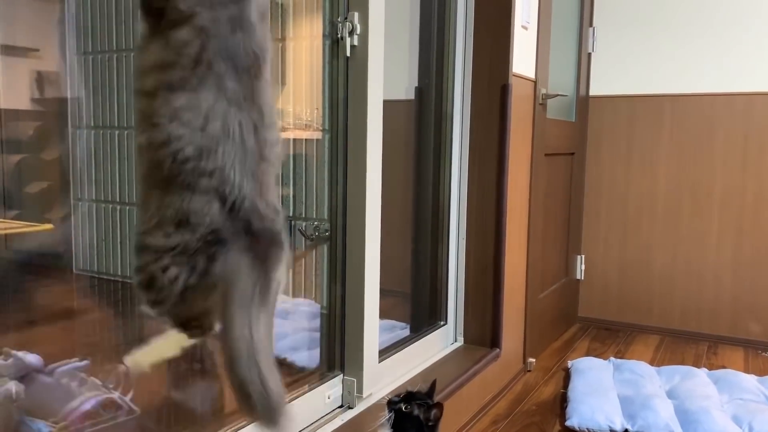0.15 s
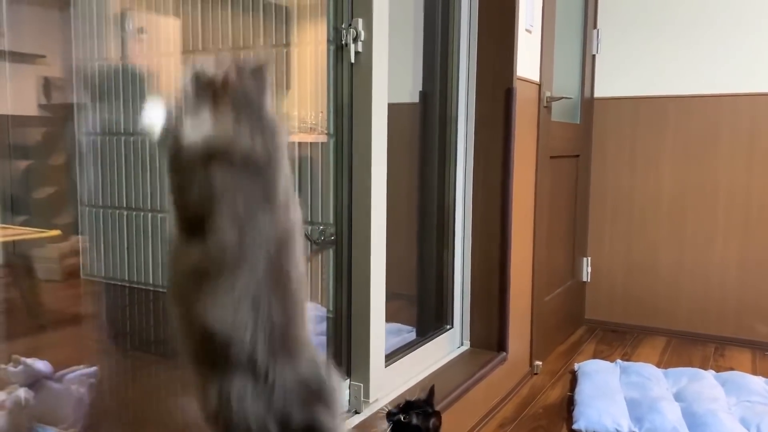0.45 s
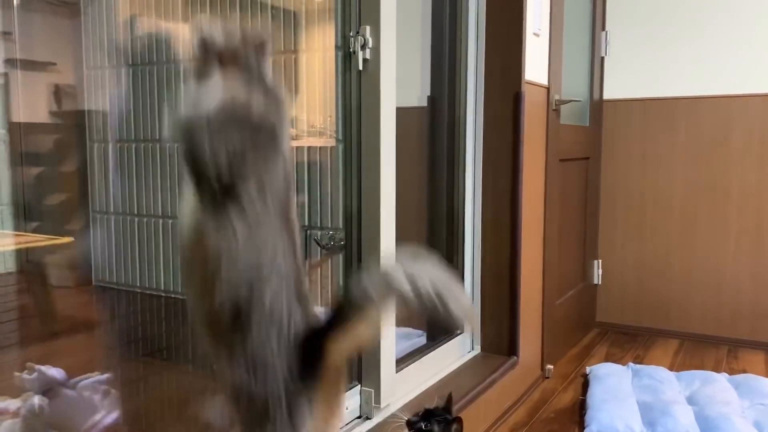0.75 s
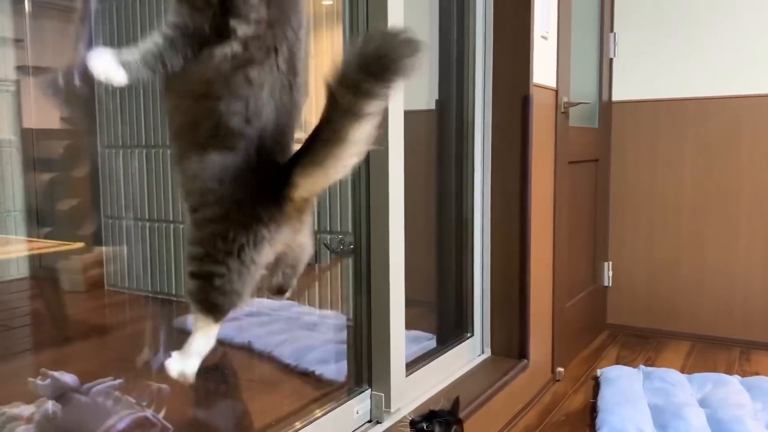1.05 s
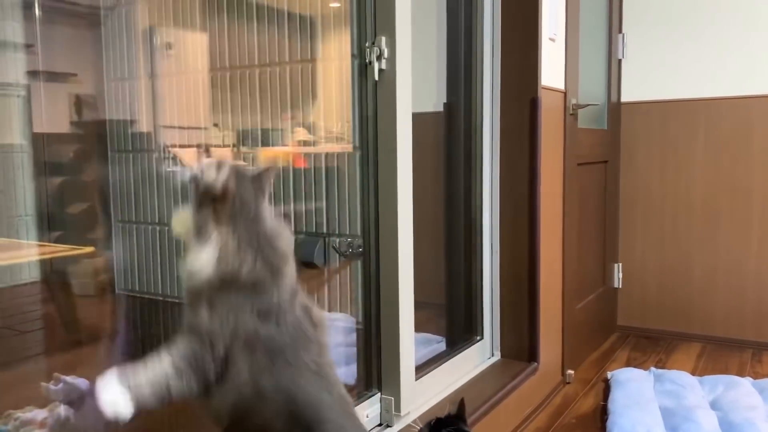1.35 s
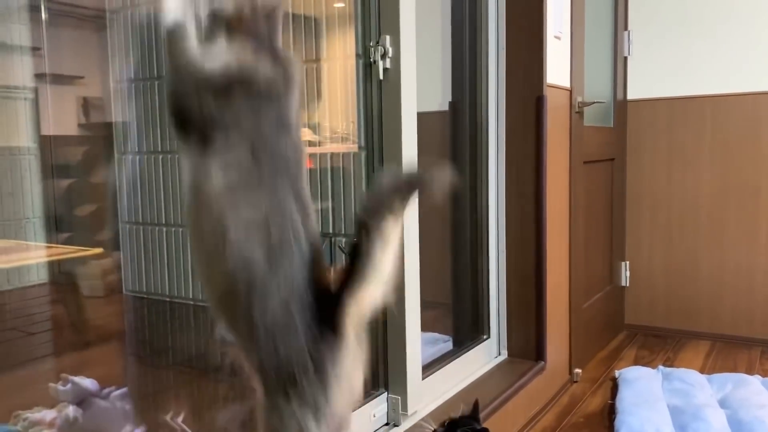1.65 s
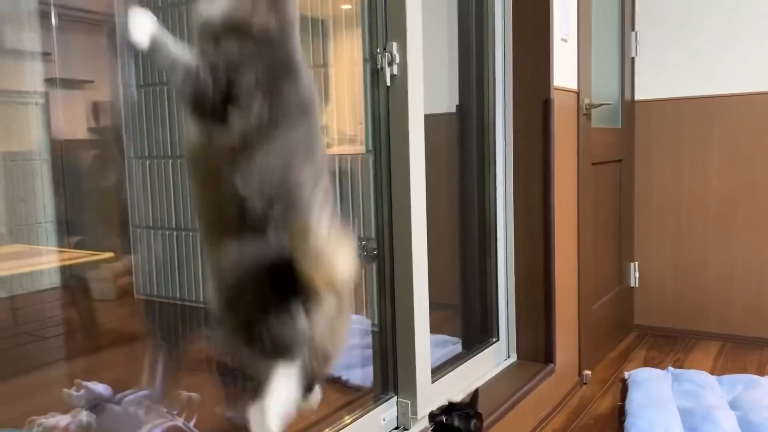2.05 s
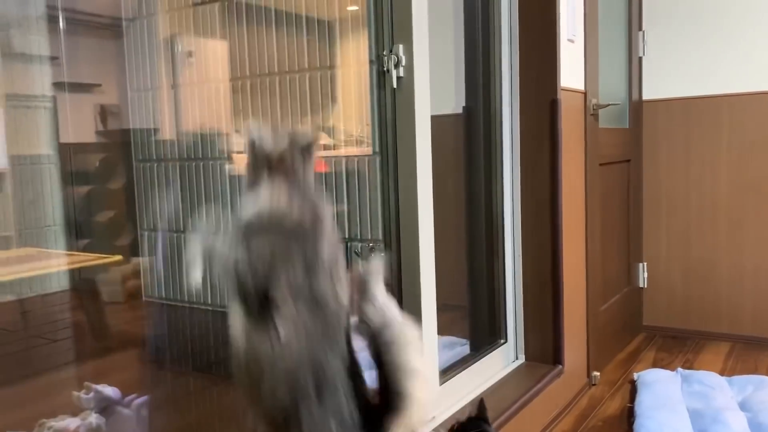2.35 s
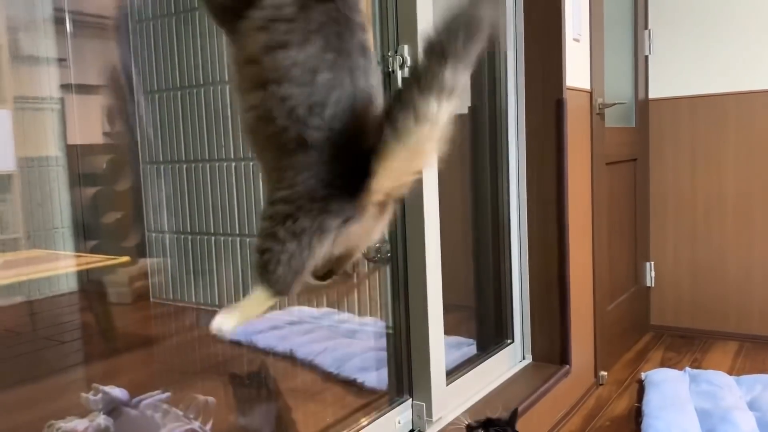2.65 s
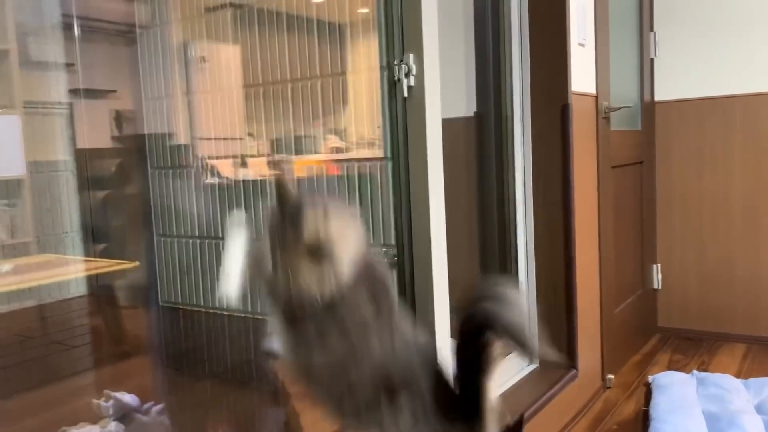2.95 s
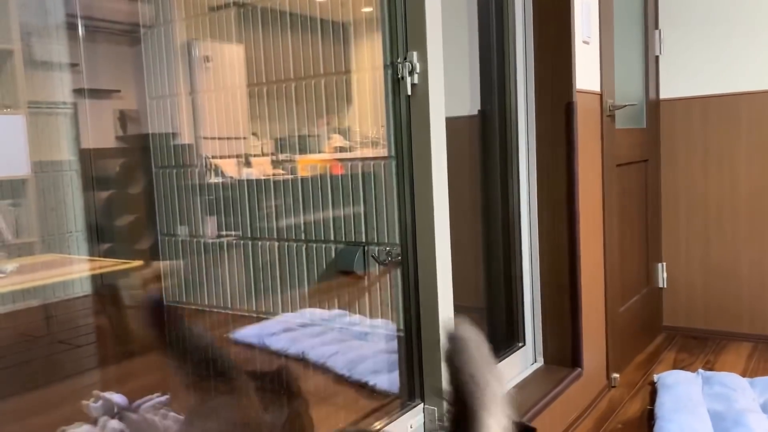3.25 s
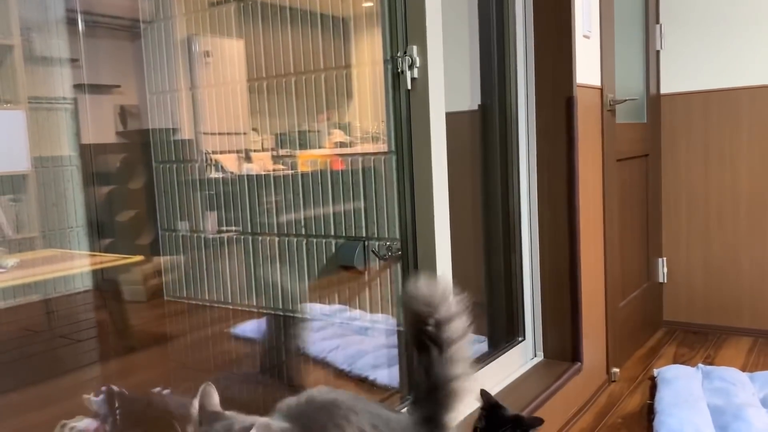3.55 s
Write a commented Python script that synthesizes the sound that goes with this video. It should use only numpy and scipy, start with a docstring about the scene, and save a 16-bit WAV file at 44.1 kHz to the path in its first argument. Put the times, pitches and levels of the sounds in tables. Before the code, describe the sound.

A cat leaps repeatedly at a glass sliding door in a small, slightly echoing room. From about 0.2 seconds, paws thud on the wooden floor roughly every half second, with brief claw scrapes, soft rubbing and low booms from the pane. Just after 3 seconds the loudest fall clatters against the door frame with a heavy thump. Faint squeaks follow until 3.6 seconds, over a quiet low hum.

```python
"""In a small, hard-walled room, a cat leaps again and again at a glass sliding door.
Its claws skid by stick-slip friction at each take-off, its paws rub the pane and set it vibrating,
and it drops back on the wooden floor, exciting the damped modes of the boards. The last fall
clatters against the door frame and ends in a heavy thump; a few faint squeaks follow.
The walls reverberate, and a quiet low hum lies under it all."""
import sys
import numpy as np
from scipy import signal
from scipy.fft import rfft, irfft
from scipy.io import wavfile
from scipy.ndimage import uniform_filter1d

SR = 44100
rng = np.random.default_rng(int(sys.argv[2]) if len(sys.argv) > 2 else 0)


def wrap_up_sound(samples):
    """Save the sound to the file named by the first command line argument, as 16-bit audio."""
    columns = np.atleast_2d(samples).T
    # keep every value between -1 and 1, then stretch to whole-number steps
    tamed = np.clip(columns, -1, 1)
    steps = np.round(tamed * 32767).astype(np.int16)
    wavfile.write(sys.argv[1], SR, steps)


N = 163170
BLOW_S = .01  # a blow's level is its energy spread over this time
# modes of the door frame (frequency [Hz], relative level [dB], T60 [s])
FRAME_MODES = [(679.6, 16, 0.22), (887, 23.3, 0.084), (1033, 2.5, 0.068), (1564, 8.4, 0.11), (1796, 8, .18),
               (2273, 2.2, 0.26)]


def amp(db):
    """Decibels to amplitude ratio."""
    return 10 ** (np.asarray(db) / 20)


def unit(x):
    """Normalisation to unit energy."""
    return x / np.sqrt(np.sum(x ** 2) + 1e-20)


def curve(points, hz):
    """Interpolation along log frequency."""
    p = np.array(points, float)
    return np.interp(np.log(hz + 1), np.log(p[:, 0]), p[:, 1])


def add(track, at_s, sound):
    """Superposition of a sound at a given time."""
    i = max(int(at_s * SR), 0)
    track[i:i + len(sound)] += sound[:max(N - i, 0)]


def through(x, response):
    """Convolution with an impulse response."""
    return signal.fftconvolve(x, response)[:N]


def colour(x, spectrum, size=4096):
    """Minimum-phase filtering that keeps the power of white noise."""
    cepstrum = irfft(np.log(amp(curve(spectrum, np.fft.rfftfreq(size, 1 / SR)))))
    cepstrum[1:size // 2] *= 2
    cepstrum[size // 2 + 1:] = 0
    return through(x, unit(irfft(np.exp(rfft(cepstrum)))))


def contact(db, decay_s, rise_s, size=6000):
    """Rough impact: a noise burst with exponential rise and decay."""
    t = np.arange(size) / SR
    burst = rng.standard_normal(size) * (1 - np.exp(-t / rise_s)) * np.exp(-t / decay_s)
    return unit(burst) * amp(db) * np.sqrt(BLOW_S * SR)


def blows(rows, decay_s, rise_s=1 / SR):
    """Impact train: one contact per (time [s], level [dB])."""
    out = np.zeros(N)
    for at, db in rows:
        add(out, at, contact(db, decay_s, rise_s))
    return out


def ring(rows, modes, rise_s=1 / SR, vary=1):
    """Free vibration: each blow excites damped modes, in a mix and tuning that vary with the spot."""
    scatter_db, detune = 3, .02
    hz, db, t60 = np.array(modes).T[:, :, None]
    out, t = np.zeros(N), np.arange(int(t60.max() * SR)) / SR
    polarity = (-1) ** np.arange(len(modes))[:, None]
    envelope = np.exp(-np.log(1000) * t / t60) * (1 - np.exp(-t / rise_s))
    spots = vary * rng.standard_normal((len(rows), 2, len(modes), 1))
    for (at, level), (mix, tune) in zip(rows, spots):
        sines = np.sin(2 * np.pi * hz * (1 + detune * tune) * t)
        tones = amp(db + scatter_db * mix) * polarity * envelope * sines
        add(out, at, unit(tones.sum(axis=0)) * amp(level) * np.sqrt(BLOW_S * SR))
    return out


def friction(slips_per_s, spread_db):
    """Stick-slip friction: dense random impulses of uneven size, rms 1."""
    slips = (rng.random(N) < slips_per_s / SR) * rng.choice([-1, 1], N)
    return unit(slips * amp(spread_db * rng.standard_normal(N))) * np.sqrt(N)


def wobble(size):
    """Random modulation: noise averaged over size samples, rms 1."""
    return unit(uniform_filter1d(rng.standard_normal(N), size=size)) * np.sqrt(N)


def diffuse(size, port_gap_m=0.14):
    """Diffuse field at two microphone ports: coherent in the bass, incoherent in the treble."""
    coherence = np.sinc(2 * np.fft.rfftfreq(size, 1 / SR) * port_gap_m / 343)
    shares = np.sqrt([(1 + coherence) / 2, (1 - coherence) / 2])
    mid, side = rfft(rng.standard_normal((2, size))) * shares
    return irfft(np.array([mid + side, mid - side]), size)


def hum(level_db=-53):
    """Ambient noise: a steady diffuse field, strongest in the bass."""
    # noise spectrum (frequency [Hz], relative density [dB])
    spectrum = [(20, -5.5), (55, 0), (250, -7), (450, -19), (1000, -26), (2000, -37.5), (5000, -49),
                (16000, -48.5)]
    return amp(level_db) * np.array([colour(side, spectrum) for side in diffuse(size=N)])


def paws():
    """Impact excitation: the cat's weight thuds and rings the boards; its pads slap and shake the frame."""
    # paws striking floor and door (time [s], weight level [dB], pad level [dB], slap pitch [Hz])
    strikes = [(.132, -57, -54, 670), (0.227, -43, -43, 1120), (0.297, -33.5, -51, 600),
               (.317, -28, -54, 583), (0.352, -34.5, -54, 500), (0.477, -48.5, -55, 550),
               (.511, -27.5, -37.5, 630), (.582, -26, -37.5, 442), (.700, -33, -50.5, 556),
               (.970, -34.5, -38.5, 425), (.988, -30, -39, 470), (1.008, -37, -66, 454),
               (1.045, -30.5, -58, 400), (1.344, -35, -39, 1150), (1.388, -37, -46.5, 840),
               (1.406, -23.5, -42.5, 986), (1.740, -66, -51.5, 716), (1.794, -44.5, -51, 540),
               (1.849, -31.5, -45.5, 630), (1.878, -32, -51, 710), (1.978, -33.5, -42.5, 570),
               (2.227, -29, -36.5, 770), (2.274, -41, -33.5, 660), (2.285, -23, -33, 557),
               (2.693, -38, -45, 490), (2.831, -34, -36.5, 489), (3.046, -27, -38, 860),
               (3.083, -18, -25, 920), (3.098, -22, -25, 795), (3.146, -14.5, -24.5, 614),
               (3.166, -15, -31, 483), (3.208, -26, -37, 430)]
    # modes of the boards (frequency [Hz], relative level [dB], T60 [s])
    floor_modes = [(171.7, -6.5, 0.24), (250.8, 7.5, .15), (297.6, -2.5, 0.25), (363.3, 3, 0.061),
                   (510.3, -13, 0.17)]
    # dull thud of the floor (frequency [Hz], relative density [dB])
    thud_spectrum = [(50, -24.5), (130, -13), (290, 1), (450, -11.5), (800, -23.5), (16000, -106)]
    # slap of a pad (frequency [multiple of its pitch], relative density [dB])
    slap_spectrum = [(.12, -28), (.5, 6.5), (1, 8), (1.7, -1.5), (3.2, -11.5), (6, -23), (25, -36)]
    board_rise_s, pad_rise_s = 0.0042, 0.0016
    weight = [(at, db) for at, db, _, _ in strikes]
    pads = [(at, db) for at, _, db, _ in strikes]
    boards = amp(-4) * ring(weight, floor_modes, board_rise_s)
    thud = amp(-5) * colour(blows(weight, decay_s=0.008, rise_s=board_rise_s), thud_spectrum)
    frame = amp(-14) * ring(pads, FRAME_MODES, pad_rise_s)
    slaps = np.zeros(N)
    for at, _, db, hz in strikes:
        spectrum = [(multiple * hz, gain) for multiple, gain in slap_spectrum]
        add(slaps, at, colour(contact(db, decay_s=0.0082, rise_s=pad_rise_s), spectrum))
    return boards + thud + frame + slaps


def claws():
    """Stick-slip friction: each skid rasps with a falling squeak; claw tips click as they catch."""
    # claws skidding (time [s], duration [s], rasp level [dB], squeak level [dB])
    skids = [(.223, 0.025, -46.5, -44.5), (0.259, 0.0089, -39, -39), (0.704, 0.03, -67, -63.5),
             (0.974, 0.016, -35, -48.5), (0.986, 0.0156, -42, -33), (1.402, .012, -45.5, -47.5),
             (1.84, .024, -42.5, -39), (1.975, 0.011, -41, -38), (2.609, 0.0236, -41.5, -37),
             (2.824, 0.017, -49, -40.5), (2.934, 0.018, -63.5, -49.5), (3.025, 0.094, -38.5, -47.5)]
    # claw tips catching (time [s], level [dB])
    catches = [(.254, -45.5), (.263, -52), (.710, -67), (.9875, -30.5), (1.405, -47.5), (1.847, -29),
               (1.979, -41), (2.6168, -29.5), (2.8292, -47.5), (3.082, -25.5), (3.092, -28)]
    # rasp of a skid (frequency [Hz], relative density [dB])
    rasp_spectrum = [(200, -18.5), (1000, 6), (2800, 5.5), (4500, -25), (6000, 2.5), (8000, 4),
                     (11000, -4.5), (16000, -23.5)]
    # click of a tip (frequency [Hz], relative density [dB])
    click_spectrum = [(300, 7.5), (2000, -14), (8000, 0), (16000, 1)]
    from_hz, to_hz, waver_depth = 4750, 4280, .17
    pressure, squeak, waver = np.zeros(N), np.zeros(N), wobble(size=24)
    for at, length, rasp_db, squeak_db in skids:
        progress = np.linspace(0, 1, int(length * SR))
        grip = np.sin(np.pi * progress)
        glide_hz = from_hz + (to_hz - from_hz) * progress
        hz = glide_hz * np.exp(waver_depth * waver[int(at * SR):][:len(progress)])
        add(pressure, at, amp(rasp_db) * grip)
        add(squeak, at, amp(squeak_db) * grip * np.sin(2 * np.pi * np.cumsum(hz) / SR))
    rasp = colour(pressure * friction(slips_per_s=2000, spread_db=4.5), rasp_spectrum)
    clicks = colour(blows(catches, decay_s=0.0019), click_spectrum)
    return rasp + squeak + clicks


def pane_booms():
    """Plate vibration: each push excites the low modes of the big pane."""
    # pushes on the glass (time [s], relative level [dB])
    pushes = [(.305, -32), (.700, -29.5), (.975, -26.5), (1.400, -32.5), (1.795, -30.5), (2.030, -35),
              (2.255, -29.5), (2.480, -35), (2.630, -30.5), (2.830, -31), (3.100, -29.5)]
    # modes of the pane (frequency [Hz], relative level [dB], T60 [s])
    modes = [(35.8, 7, 0.98), (54.9, 9, 1), (68.6, -1.5, 1), (86.5, 7, 0.16)]
    return amp(4) * ring(pushes, modes, rise_s=0.002, vary=0)


def thumps():
    """Heavily damped resonance: the cat's full weight comes down with a short, low thump."""
    # full landings (time [s], level [dB])
    landings = [(.527, -34.5), (.586, -33), (1.356, -28), (2.245, -25.5), (3.048, -24.5), (3.105, -24)]
    # modes of a landing (frequency [Hz], relative level [dB], T60 [s])
    modes = [(100.7, 7, 0.017), (130.6, 6, 0.041), (173, -6.5, 0.058)]
    return ring(landings, modes)


def pane_rubs(scuff_db=3.5):
    """Sliding friction: paws and fur grip and let go of the glass, whispering in short scuffs."""
    # slides on the glass (time [s], duration [s], level [dB])
    slides = [(.748, .17, -48.5), (1.176, 0.19, -55), (1.68, 0.18, -52), (2.428, 0.21, -51.5),
              (2.77, 0.14, -44.5), (2.864, 0.18, -49)]
    # rubbing noise (frequency [Hz], relative density [dB])
    spectrum = [(100, 15), (600, -5), (1500, -6), (3300, -17), (7000, -33.5), (16000, -27.5)]
    pressure = np.zeros(N)
    for at, length, db in slides:
        add(pressure, at, amp(db) * signal.windows.tukey(int(length * SR)))
    scuffs = unit(amp(scuff_db * wobble(size=500))) * np.sqrt(N)
    return colour(pressure * scuffs * friction(slips_per_s=3000, spread_db=4.0), spectrum)


def frame_knocks():
    """Hard impact: a brief contact gives a broadband crack and rings the door frame's modes."""
    # knocks on the frame (time [s], level [dB])
    knocks = [(2.285, -44), (3.042, -30.5), (3.082, -21), (3.091, -29.5), (3.102, -25.5)]
    # crack of a knock (frequency [Hz], relative density [dB])
    spectrum = [(100, 5.5), (600, -14.5), (1800, 0), (2800, -7.5), (4500, -17.5), (8000, -26),
                (16000, -19.5)]
    crack = colour(blows(knocks, decay_s=0.0021), spectrum)
    return crack + amp(-8) * ring(knocks, FRAME_MODES, vary=0)


def faint_squeaks():
    """Frequency modulation: short, thin tones waver and rise a little after the fall."""
    # squeaks (time [s], frequency [Hz], level [dB])
    squeaks = [(3.320, 3080, -57), (3.335, 5370, -56), (3.454, 3020, -65), (3.535, 3090, -73.5),
               (3.595, 5350, -75.5), (3.625, 3110, -78)]
    length_s, pitch_rise, waver_depth = 0.036, 0.023, .024
    out, waver = np.zeros(N), wobble(size=60)
    progress = np.linspace(0, 1, int(length_s * SR))
    for at, hz, db in squeaks:
        bend = pitch_rise * (progress - .5) + waver_depth * waver[int(at * SR):][:len(progress)]
        tone = np.sin(2 * np.pi * np.cumsum(hz * (1 + bend)) / SR)
        add(out, at, amp(db) * np.sin(np.pi * progress) * tone)
    return out


def echoes(bands=19, build_up_s=0.00084, size=2 ** 15):
    """Reverberation: the impulse response for one spot is a diffuse tail that decays band by band."""
    # reverberation time (frequency [Hz], T60 [s])
    room_t60 = [(250, 0.35), (1000, 0.47), (2500, 0.39), (4500, 0.4535), (12000, 0.61)]
    # reverberant strength (frequency [Hz], level against the direct sound [dB])
    room_db = [(60, -21.5), (120, 1), (300, -0.5), (1000, 1), (4500, 2.5), (8000, -3), (12000, -12)]
    t, hz = np.arange(size) / SR, np.fft.rfftfreq(size, 1 / SR)
    centres = np.geomspace(35, 18000, bands)
    onset = 1 - np.exp(-(t / build_up_s) ** 2)
    noise, response = rfft(diffuse(size=size)), np.zeros((2, size))
    for centre, pick in zip(centres, np.eye(bands)):
        band = irfft(noise * curve(list(zip(centres, pick)), hz), size)
        fade = unit(onset * np.exp(-np.log(1000) * t / curve(room_t60, centre)))
        response += band * fade * amp(curve(room_db, centre))
    return response


def room(x, spots=4):
    """Path differences: direct sound reaches the left port first; echoes change as the cat moves."""
    left_lead_s, pan_db, move_s = .00023, 1.18, .11
    delayed = np.pad(x, (int(left_lead_s * SR), 0))[:N]
    out = np.array([amp(pan_db) * x, amp(-pan_db) * delayed])
    for spot in range(spots):
        away = (np.arange(N) / SR / move_s - spot) % spots - 1
        here = x * np.cos(np.pi / 2 * np.clip(away, -1, 1))  # equal-power crossfade between spots
        out += [through(here, side) for side in echoes()]
    return out


def scene():
    """Superposition: cat, door and floor sound in the room, over its quiet hum."""
    background = hum()
    sources = paws() + claws() + pane_booms() + thumps() + pane_rubs() + frame_knocks() + faint_squeaks()
    return room(sources) + background


def record(dry, top_hz=15800):
    """Frequency response: the microphone has two narrow dips in the treble, and the top is cut."""
    # microphone notches (frequency [Hz], half width [Hz], depth [dB])
    notches = [(9676, 555, 23), (13520, 330, 44)]
    hz = np.fft.rfftfreq(2 * N, 1 / SR)
    loss_db = sum(depth * np.exp(-((hz - centre) / width) ** 2) for centre, width, depth in notches)
    heard = irfft(rfft(dry, 2 * N) * amp(-loss_db))[:, :N]
    return signal.sosfilt(signal.ellip(8, .2, 80, top_hz, fs=SR, output="sos"), heard)


dry = scene()
out = record(dry)
wrap_up_sound(out)
```